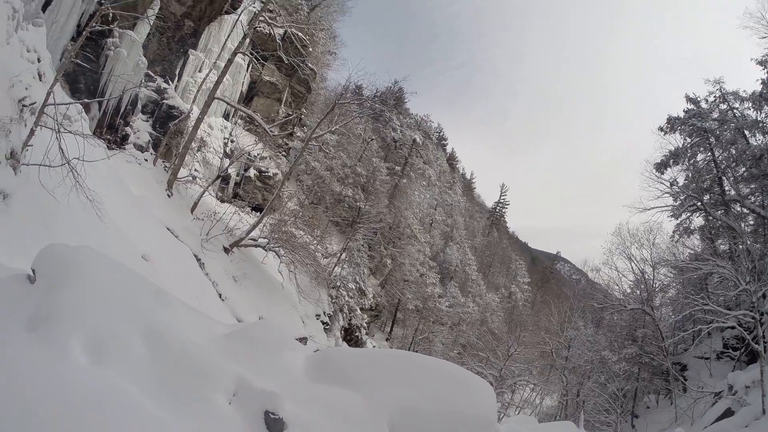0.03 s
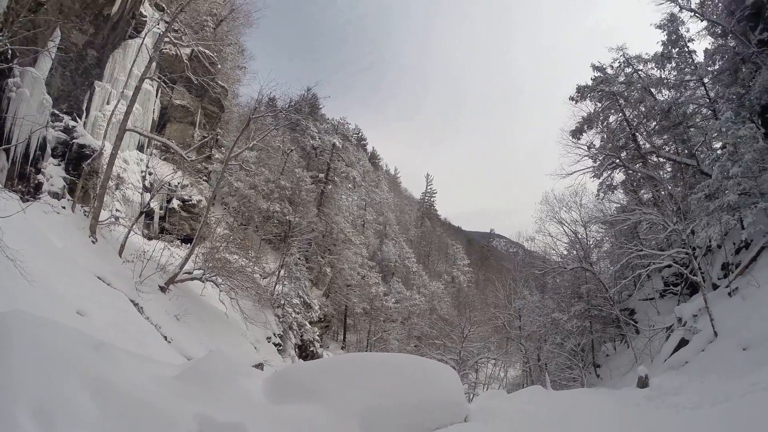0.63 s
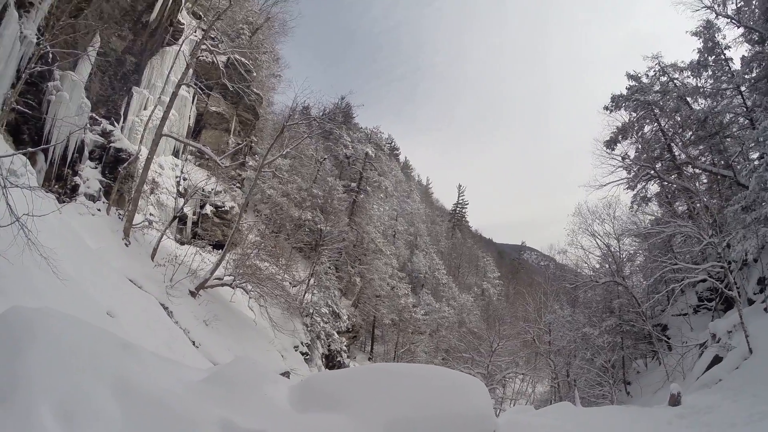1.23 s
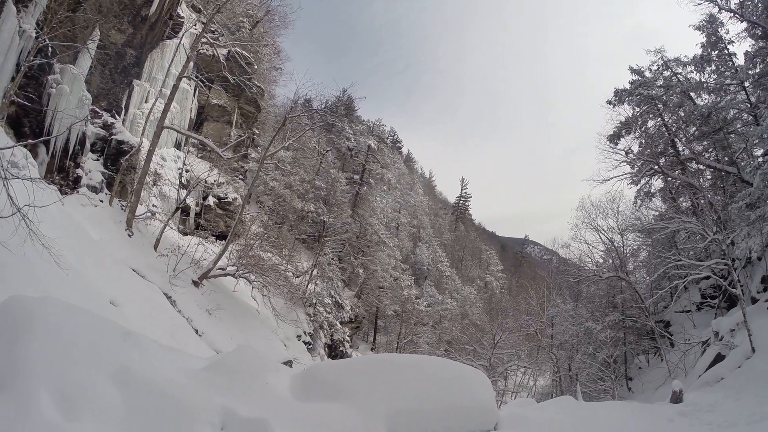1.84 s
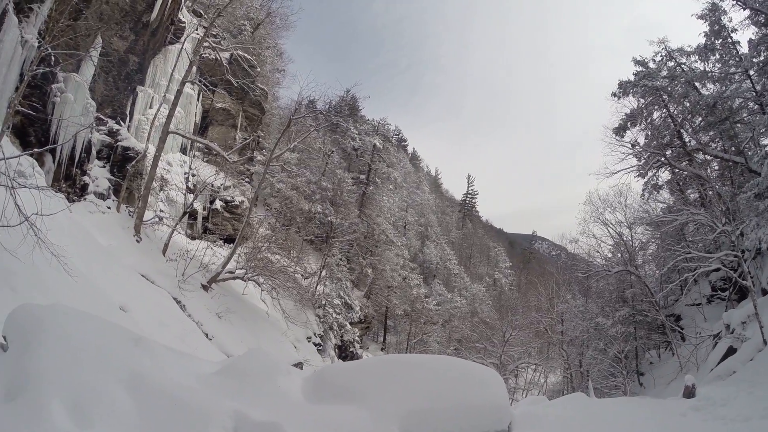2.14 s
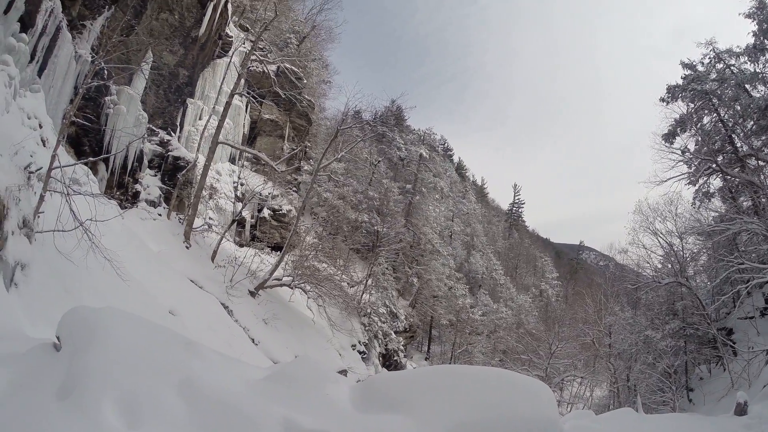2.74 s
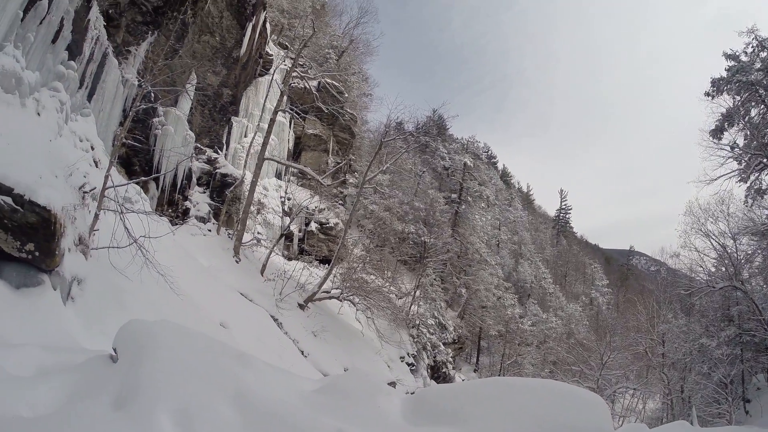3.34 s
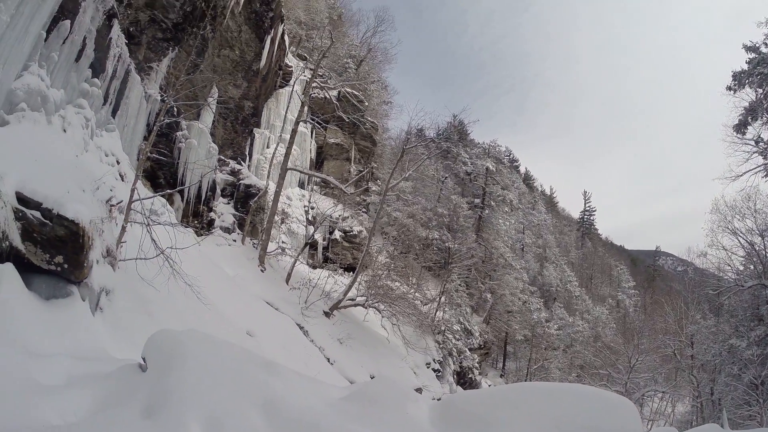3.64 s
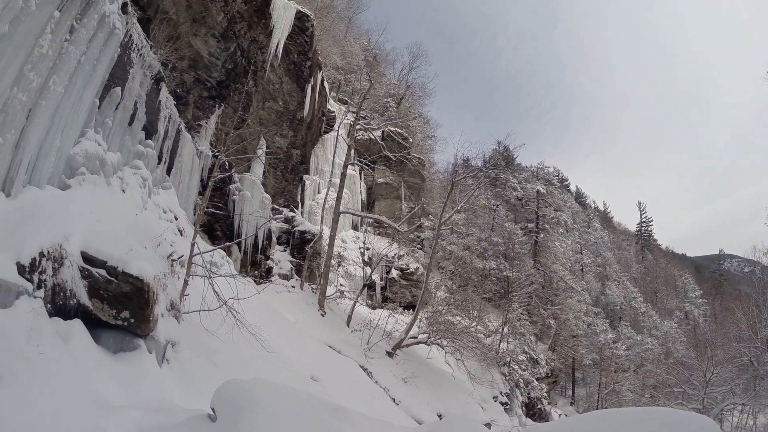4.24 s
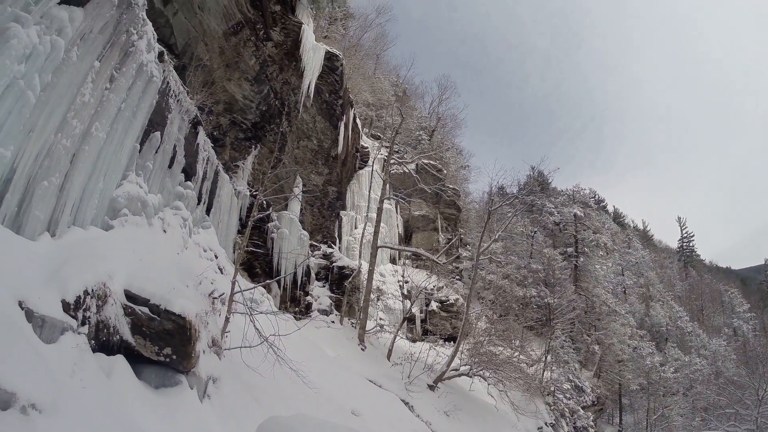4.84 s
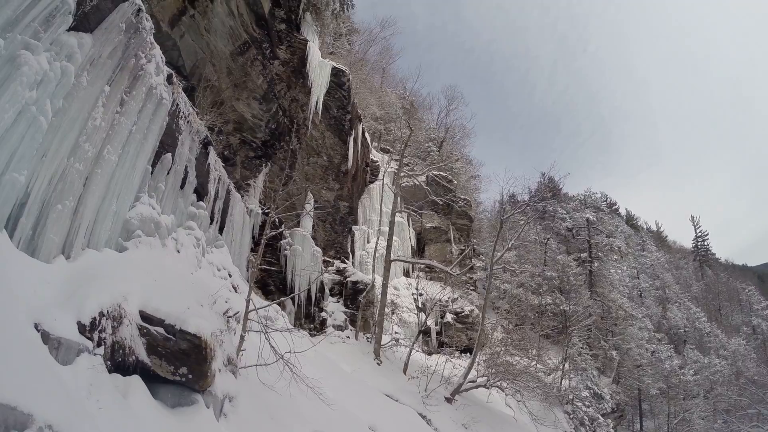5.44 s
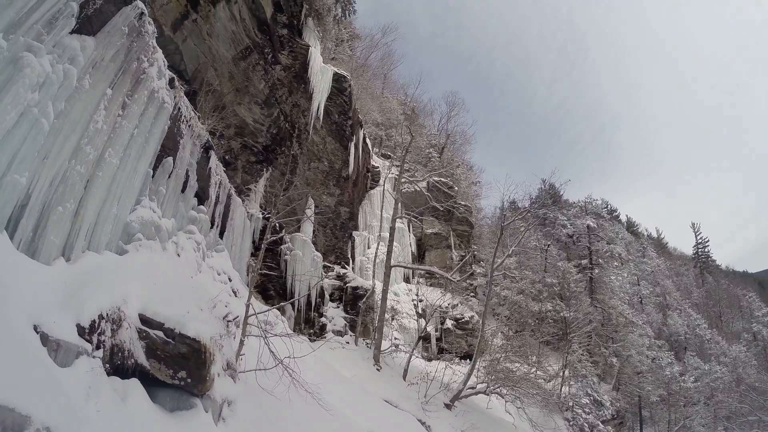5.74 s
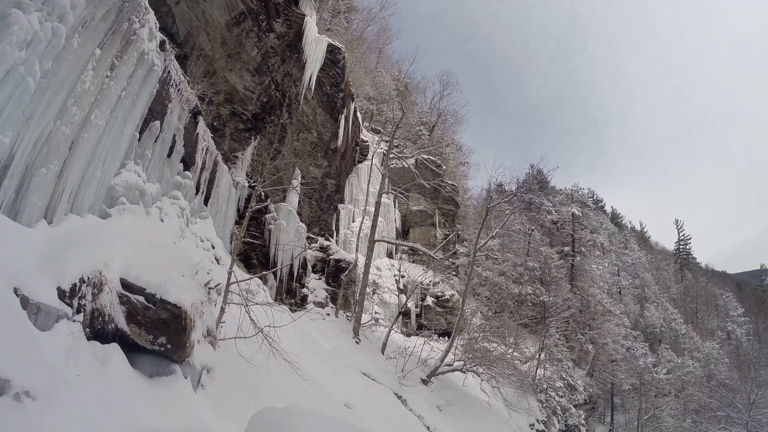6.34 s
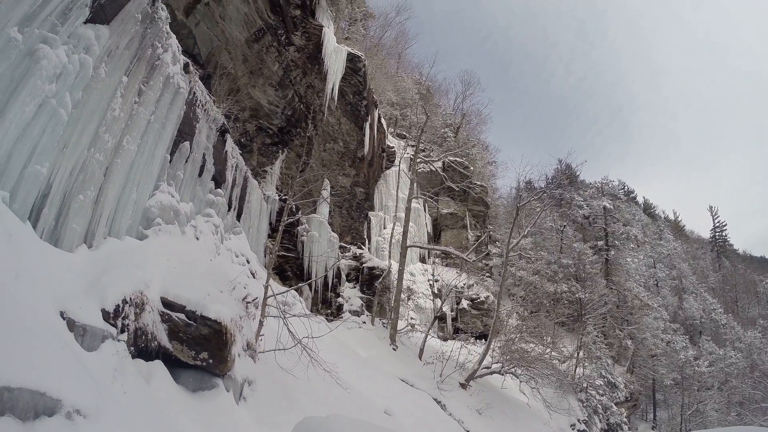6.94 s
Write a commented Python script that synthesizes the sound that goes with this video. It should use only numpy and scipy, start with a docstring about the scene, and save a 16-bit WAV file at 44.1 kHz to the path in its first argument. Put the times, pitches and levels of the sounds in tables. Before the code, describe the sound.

A sharp click and close, scratchy bursts of camera handling give way to near silence in a still, snowy valley.

```python
"""A hand shifts its grip on a small camera in a still, snowy valley.
Fingers knock on the stiff housing and make it ring, the hand rubs past the microphone,
and the palm bumps the camera. One finger sticks and slips in a short creak.
Then only faint hiss, a low rumble of air, an odd tick and one very light brush remain."""
import sys
import numpy as np
from scipy import signal
from scipy.fft import rfft, irfft
from scipy.io import wavfile

SR = 44100
rng = np.random.default_rng(int(sys.argv[2]) if len(sys.argv) > 2 else 0)


def master_out(mix):
    """Clip the mix to full scale and print it as 16-bit PCM to the path in sys.argv[1]."""
    frames = np.transpose(np.atleast_2d(mix))
    ceiling = np.clip(frames, -1, 1)
    pcm = np.round(ceiling * 32767).astype(np.int16)
    wavfile.write(sys.argv[1], SR, pcm)


N = 312228
TIME = np.arange(N) / SR

# The tone of the valley's hiss. Each row: frequency in Hz, relative level in dB.
HISS_TONE = [(59, -30.5), (100, -4), (355, -9), (394, -9), (668, -11), (1520, -14), (2220, -16),
             (3180, -16.5), (4460, -21), (5870, -21.5), (8230, -27.5), (10400, -26), (12600, -32),
             (14200, -26), (15500, -36)]
# The tone of the air's rumble. Each row: frequency in Hz, relative level in dB.
RUMBLE_TONE = [(8.8, -28.5), (15, 4), (27, 8), (70, -2.5), (102, -12.5), (200, -20), (260, -46.5),
               (440, -120)]
# Air over the microphone sinks to a lull and picks up. Each row: time in seconds, relative level in dB.
AIR_LEVELS = [(1.5, -57), (1.85, -60.5), (2.6, -62), (3.2, -63), (5.3, -68), (6.65, -58)]
# The notes at which the housing rings. Each row: pitch in Hz, width in Hz, level in dB,
# sign at the microphone (-1 flips the wave).
HOUSING_NOTES = [(990, 340, -13, 1), (1379, 220, -2.5, 1), (1910, 319, -15, -1), (2240, 260, -6, -1),
                 (2496, 180, -3.5, 1), (2996, 360, -13, -1), (3852, 199, -24, 1), (4378, 1100, -30.5, 1),
                 (5040, 290, -23, 1), (6240, 980, -25.5, 1), (6960, 867, -29.5, 1), (8014, 220, -34.5, 1),
                 (10500, 1200, -42.5, 1), (13700, 600, -25.5, 1)]
# The slow give of the casing under a push. Each row: pitch in Hz, width in Hz, level in dB, sign.
CASING_NOTES = [(139, 276, 0, 1), (249, 340, 3.5, -1), (395, 150, 1.5, 1)]
# Fingers knock with some weight behind them.
# Each row: start in seconds, relative ring in dB, sharpness in Hz, relative push in dB.
FINGER_KNOCKS = [(0.0721, 2, 5970, -1), (0.1071, 22, 5600, 26), (0.1137, 15, 5800, 14.5),
                 (0.1227, 19, 9100, 17.5), (0.1247, 23.5, 12100, 12.5), (0.35, -2, 1980, -0.5),
                 (0.4354, -2, 3400, 17.5), (0.6281, 15, 1550, 20), (1.0238, 9, 2480, 12),
                 (1.326, 10, 9000, 13.5)]
# Dry ticks of the housing alone. Each row: start in seconds, relative ring in dB, sharpness in Hz.
DRY_TICKS = [(0.1548, 1, 3220), (0.305, -15, 1950), (0.444, 5.5, 12200), (0.8351, 3, 15500),
             (0.9268, 15, 13800), (1.348, 13, 14000), (1.38, 10.5, 3000), (1.4340, 3.5, 2800),
             (1.4689, -9, 3500), (1.8397, -14, 3990), (1.9230, 0, 5500), (2.0613, -16, 2330),
             (2.4160, -17.5, 1806), (3.9600, -13.5, 2070), (5.942, -16, 2630), (6.8698, -14, 2040)]
# Strokes of the hand; the last is its light, lasting hold. Each row: start in seconds,
# length in seconds, then relative levels of friction, swish and pressure in dB.
HAND_STROKES = [(0.099, 0.1, -54.5, -68, -51.5), (0.312, 0.038, -56, -64, -51),
                (0.439, 0.13, -44.5, -51, -44), (0.606, 0.13, -46, -54, -40.5),
                (0.835, 0.18, -46.5, -57, -42.5), (0.959, 0.057, -33.5, -46, -31),
                (1.027, 0.074, -45, -52, -36.5), (1.147, 0.041, -49, -58.5, -39.5),
                (1.235, 0.12, -33.5, -42, -33), (1.363, 0.035, -31.5, -49.5, -39),
                (1.419, 0.013, -36.5, -58, -62), (0.424, 0.87, -55, -65.5, -49)]
# The hand moves fastest in mid-stroke. Friction, swish and pressure lose this many dB at either end.
STROKE_END_DROP_DB = (2, 3, 3)
# The tone of the swish over the microphone's opening. Each row: frequency in Hz, relative level in dB.
SWISH_TONE = [(2500, -4), (3400, 8), (4100, -14.5), (4800, 0.5), (5600, -1), (6400, 1), (7300, -7),
              (8200, -13.5), (9500, -11.5), (15000, -25)]
# The tone of a firm stroke's high fizz. Each row: frequency in Hz, relative level in dB.
FIZZ_TONE = [(3000, 3.5), (4000, 0.5), (7000, -7), (9500, -7.5), (11500, -12.5), (13400, -10.5),
             (15500, -22)]
# The deep tone of the hand's uneven pressing. Each row: frequency in Hz, relative level in dB.
PRESSURE_TONE = [(20, 4), (45, 6.5), (90, 5), (150, 0.5), (250, -6), (400, -9), (600, -13), (900, -27),
                 (1500, -46)]
# Soft bumps of the palm. Each row: start in seconds, relative level in dB, pitch in Hz.
PALM_BUMPS = [(0.1103, -26, 89), (0.447, -31.5, 21.82), (1.2498, -24.5, 62.4), (1.27, -26, 81),
              (3.891, -48.5, 130.5), (5.748, -47, 89.5), (6.051, -49.5, 102)]
# How fast the creaking finger slips. Each row: time in seconds, slips per second.
SLIP_SPEEDS = [(0.6362, 130), (0.6517, 225), (0.6637, 224), (0.6817, 344), (0.6867, 114), (0.6977, 281),
               (0.7107, 50), (0.7130, 50)]
# How hard it slips. Each row: time in seconds, relative force in dB.
SLIP_STRENGTHS = [(0.640, 30), (0.649, 23.5), (0.662, 29), (0.684, 27.5), (0.690, 24), (0.703, 24),
                  (0.711, 17)]


def from_db(db):
    """Turn decibels into a number to multiply by."""
    return 10 ** (np.asarray(db) / 20)


def unit_power(x):
    """Scale a sound to an average power of 1."""
    return x / np.sqrt(np.mean(x ** 2) + 1e-20)


def curve(rows):
    """Join (time, value) points with straight lines."""
    return np.interp(TIME, *np.transpose(rows))


def low_pass(x, hz, order=2):
    """Soften the sound above hz."""
    return signal.sosfilt(signal.butter(order, min(hz, .45 * SR), fs=SR, output="sos"), x + 1e-18)


def high_pass(x, hz, order=2):
    """Thin out the sound below hz."""
    return signal.sosfilt(signal.butter(order, min(hz, .45 * SR), "high", fs=SR, output="sos"), x)


def noise(tone):
    """Noise of power 1, shaped by a tone table and fading beyond its ends."""
    hz, db = np.transpose(tone)
    freqs = np.maximum(np.arange(N // 2 + 1) * SR / N, 1)
    ends = np.minimum(freqs / hz[0], 1) ** 2 * np.minimum(hz[-1] / freqs, 1) ** 2
    shape = from_db(np.interp(np.log(freqs), np.log(hz), db))
    return unit_power(irfft(rfft(rng.standard_normal(N)) * ends * shape, N))


def wobble(hz):
    """A random wobble of about size 1, mostly slower than hz."""
    return unit_power(low_pass(rng.standard_normal(N), hz))


def resonate(force, notes):
    """Let a force ring several fading notes at once."""
    out = np.zeros(N)
    for hz, width_hz, db, sign in notes:
        decay = np.exp(-np.pi * width_hz / SR)
        feedback = [1, -2 * decay * np.cos(2 * np.pi * hz / SR), decay ** 2]
        gain = sign * from_db(db) * (1 - decay ** 2) / 2
        out += gain * signal.lfilter([1, 0, -1], feedback, force + 1e-18)
    return out


def add(track, start_s, sound):
    """Lay a short sound into a track."""
    at = int(start_s * SR)
    track[at:at + len(sound)] += sound[:N - at]


def valley_air(hiss_db=-65, gust_db=1.0, lift_db=0.5):
    """The valley hisses evenly while air rumbles over the microphone."""
    rumble = from_db(curve(AIR_LEVELS) + lift_db + gust_db * wobble(7)) * noise(RUMBLE_TONE)
    return from_db(hiss_db) * noise(HISS_TONE) + rumble


def housing(force, lowest_hz=850, gap_hz=10300):
    """The stiff housing rings; the microphone's opening cuts a gap in the treble."""
    ringing = high_pass(resonate(force, HOUSING_NOTES), lowest_hz, order=4)
    return signal.lfilter(*signal.iirnotch(gap_hz, Q=2.5, fs=SR), ringing)


def casing(force, highest_hz=720, gap_hz=600, gap_narrowness=1.0):
    """A push arrives as a dull knock, with a gap in pitch between it and the housing's ring."""
    gap = signal.iirnotch(gap_hz, gap_narrowness, fs=SR)
    return -low_pass(signal.lfilter(*gap, resonate(force, CASING_NOTES)), highest_hz)


def taps(scuff_db=-25, rise_s=.0007, fall_s=.002, lead_s=.006):
    """Each knock or tick is a blow inside a brief scuff, and rings the housing."""
    t = TIME[:SR // 30] - lead_s
    blow = signal.unit_impulse(len(t), int(lead_s * SR))
    scuff = from_db(scuff_db) * np.exp(-np.maximum(t / fall_s, -t / rise_s))

    def contact(sharp_hz):
        """One touch: the sharper it is, the brighter and thinner it sounds."""
        touch = blow + scuff * rng.standard_normal(len(t))
        return high_pass(low_pass(touch, sharp_hz, order=3), 0.16 * sharp_hz)

    firm, light, push = np.zeros((3, N))
    for start_s, ring_db, sharp_hz, push_db in FINGER_KNOCKS + judder():
        add(firm, start_s - lead_s, from_db(ring_db) * contact(sharp_hz))
        add(push, start_s - lead_s, from_db(push_db) * blow)
    for start_s, ring_db, sharp_hz in DRY_TICKS + settling():
        add(light, start_s - lead_s, from_db(ring_db) * contact(sharp_hz))
    ticks = housing(light, lowest_hz=1200)   # with no weight behind it, a tick barely stirs the low note
    thuds = casing(push, highest_hz=913.5, gap_hz=844, gap_narrowness=2.4)
    return housing(firm) + ticks + thuds


def strokes(rise_share=0.15, fade_share=0.23):
    """Friction, swish and pressure swell and fade with each stroke; the strongest stroke wins."""
    gains = np.zeros((3, N))
    for start_s, length_s, *levels_db in HAND_STROKES:
        progress = (TIME - start_s) / length_s
        fade = np.maximum(-progress / rise_share, (progress - 1) / fade_share)
        off_middle = (2 * np.clip(progress, 0, 1) - 1) ** 2
        db = np.array(levels_db)[:, None] - np.outer(STROKE_END_DROP_DB, off_middle)
        gains = np.maximum(gains, from_db(db) * np.exp(-np.clip(fade, 0, 20)))
    return gains


def rubbing(catches_per_s=1000, soft_hz=3600, squeaky_db=-29, fizz_boost_db=44):
    """Tiny catches of skin ring the housing as the hand swishes and presses over the microphone."""
    friction, swish, pressure = strokes()
    catches = (rng.random(N) < catches_per_s / SR) * rng.choice([-1, 1], N)
    catches = catches * from_db(2 * wobble(150))
    scrape = unit_power(housing(low_pass(catches, soft_hz)))
    squeal = unit_power(housing(squeaks()))
    # the harder the friction, the more of it turns into squeaks
    squeak_share = np.clip(friction / from_db(squeaky_db), 0, .7)
    skin = np.sqrt(1 - squeak_share) * scrape + np.sqrt(squeak_share) * squeal
    sweep = swish * from_db(-1) * noise(SWISH_TONE)
    # fizz grows with the square of the swish, so only firm strokes have it
    fizz = swish ** 2 * from_db(fizz_boost_db) * noise(FIZZ_TONE)
    pressing = pressure * noise(PRESSURE_TONE)
    flicker = from_db(2.4 * wobble(200))
    return friction * skin + (sweep + fizz) * flicker + pressing


def squeaks(per_s=220, width_hz=110, uneven_db=1.5):
    """Small patches of skin let go and sing for an instant, each at one of twelve pitches."""
    pitches_hz = np.geomspace(1130, 2750, 12)
    releases = (rng.random(N) < per_s / SR) * from_db(uneven_db * wobble(220))
    choice = rng.integers(0, len(pitches_hz), N)
    notes = (resonate(releases * (choice == k), [(hz, width_hz, 0, 1)])
             for k, hz in enumerate(pitches_hz))
    return unit_power(sum(notes))


def palm_bumps(fade_cycles=0.81, lift_db=3.5):
    """The palm sets the whole camera swinging for about one cycle."""
    out, t = np.zeros(N), TIME[:SR // 4]
    for start_s, db, hz in PALM_BUMPS:
        swing = np.sin(2 * np.pi * hz * t) * np.exp(-hz * t / fade_cycles)
        add(out, start_s, from_db(db + lift_db) * swing)
    return out


def creak(sharp_hz=3700, weak_hz=2400, skin_hz=8400, uneven_db=0.06):
    """A finger sticks and slips, speeds up, falters and stalls; strong slips sound sharper."""
    sliding = (TIME >= SLIP_SPEEDS[0][0]) & (TIME <= SLIP_SPEEDS[-1][0])
    slips_so_far = np.ceil(np.cumsum(curve(SLIP_SPEEDS) * sliding) / SR)
    slips = np.flatnonzero(np.diff(slips_so_far))
    force_db = curve(SLIP_STRENGTHS)
    force = np.zeros(N)
    force[slips] = from_db(force_db + uneven_db * rng.standard_normal(N))[slips]
    hardness = from_db(force_db - force_db.max())
    contact = low_pass(force * hardness, sharp_hz) + low_pass(force * (1 - hardness), weak_hz)
    return housing(low_pass(contact, skin_hz, order=5)) + casing(force)


def judder(start_s=0.9679, gap_s=0.0097, count=5, ring_db=6.5, sharp_hz=3380, push_db=5, uneven_db=4):
    """A dragging finger judders: rows for a quick, even run of knocks, no two quite alike."""
    return [(start_s + k * gap_s, ring_db + extra_db, sharp_hz, push_db + extra_db)
            for k, extra_db in enumerate(uneven_db * rng.standard_normal(count))]


def settling(start_s=1.3, gap_s=0.038, count=8, ring_db=-15, sharp_hz=2400, uneven_db=5.5):
    """The grip comes to rest: rows for faint, loosely spaced ticks of the housing."""
    return [(start_s + (k + 0.23 * late) * gap_s, ring_db + uneven_db * size, sharp_hz)
            for k, (late, size) in enumerate(rng.standard_normal((count, 2)))]


def brush(peak_s=3.47, swell_s=.06, peak_db=-75):
    """One very light, airy brush as the camera turns."""
    swell = np.exp(-((TIME - peak_s) / swell_s) ** 2)
    return from_db(peak_db) * swell * noise([(4500, 0.5), (11500, -2.5)])


def scene():
    """The handling, close and without echo, over the quiet valley, in one channel."""
    return (taps() + palm_bumps() + creak() + rubbing() + brush() + valley_air())[None]


def record(dry, silent_until_s=.07, muted_db=-30, ceiling=.88, cutoff_hz=15300):
    """The first moment is almost silent; peaks are rounded and the highest treble is cut."""
    gate = np.where(TIME < silent_until_s, from_db(muted_db), 1)
    rounded = dry / (1 + (dry / ceiling) ** 6) ** (1 / 6)
    treble_cut = signal.ellip(10, .1, 80, cutoff_hz, fs=SR, output="sos")
    return signal.sosfilt(treble_cut, rounded * gate)


dry = scene()
out = record(dry)
master_out(out)
```